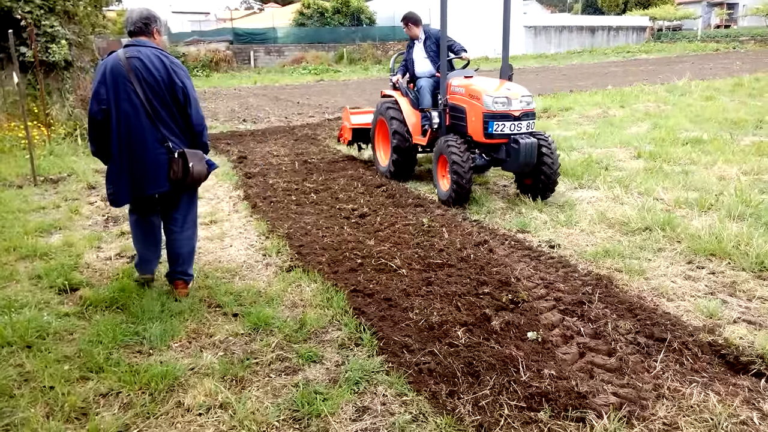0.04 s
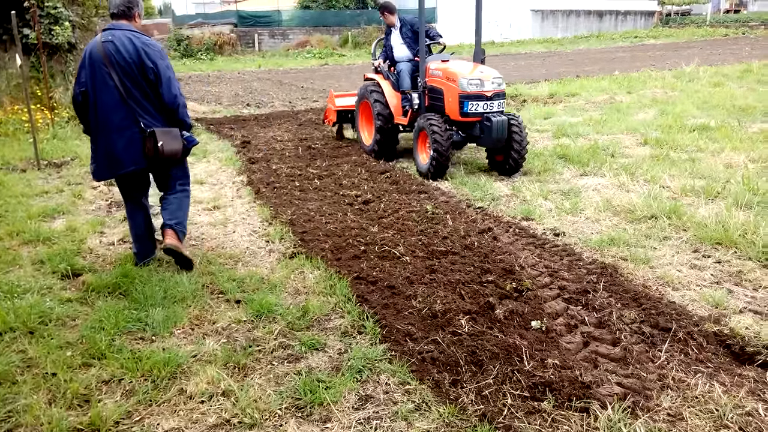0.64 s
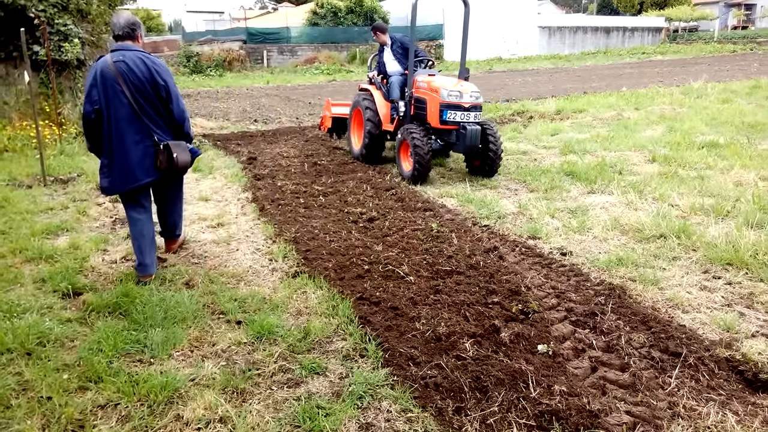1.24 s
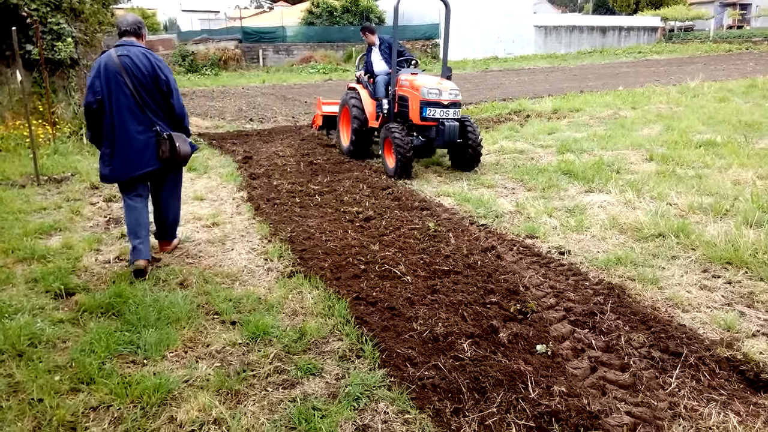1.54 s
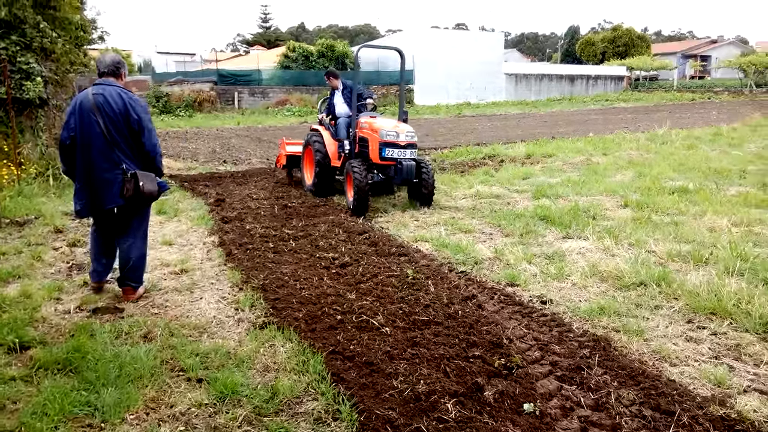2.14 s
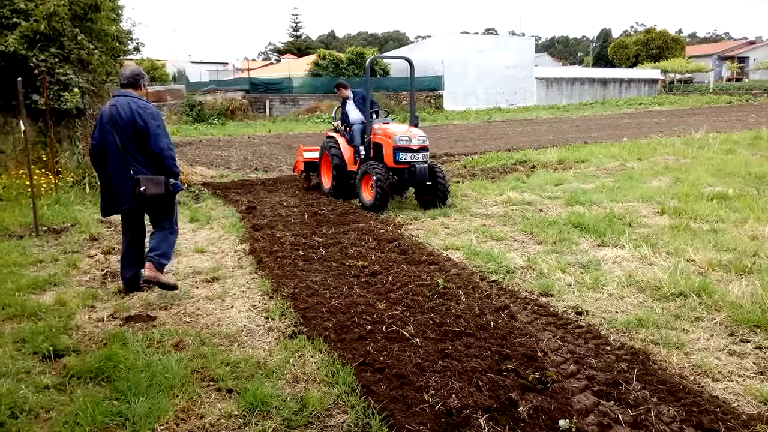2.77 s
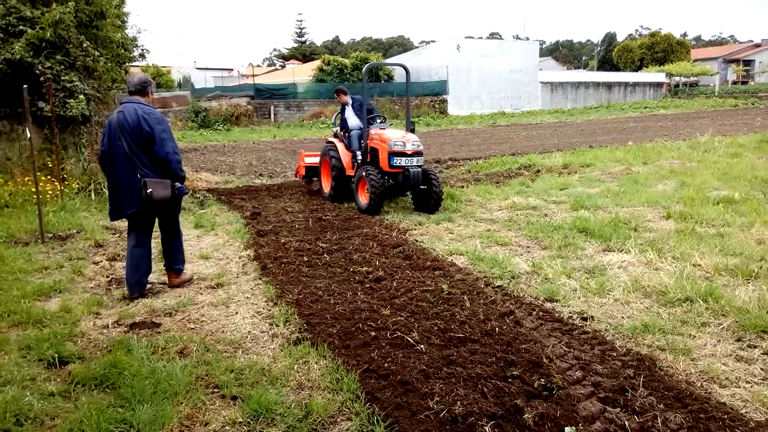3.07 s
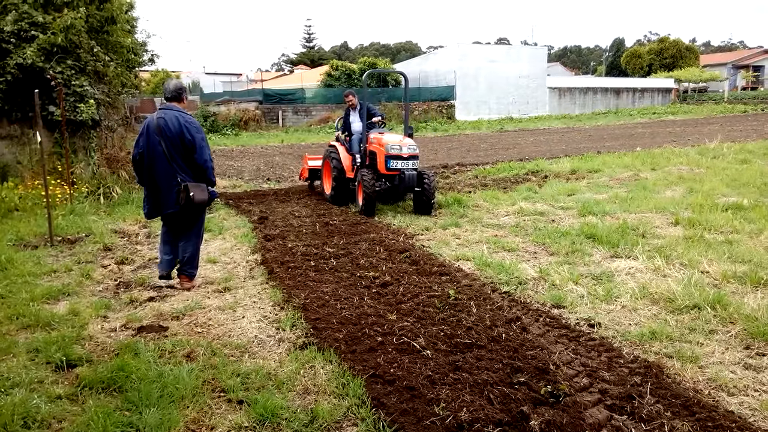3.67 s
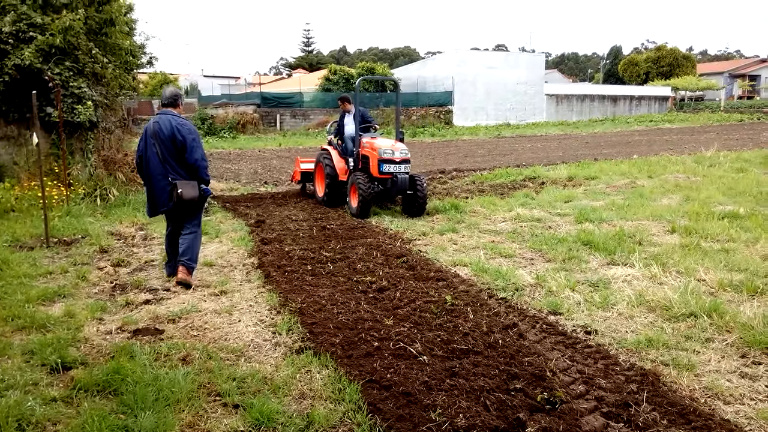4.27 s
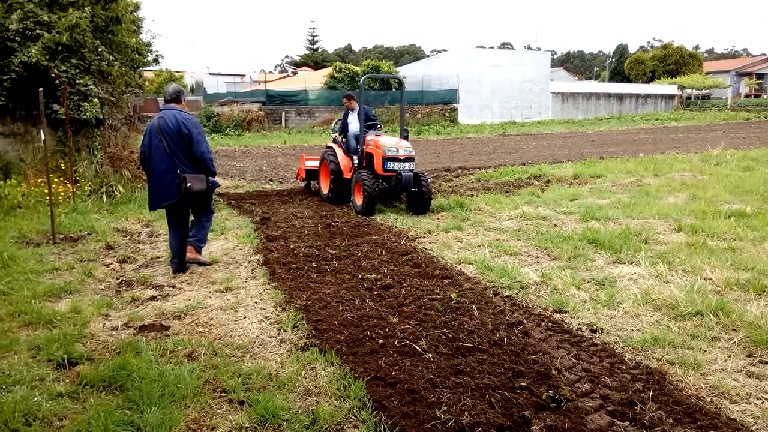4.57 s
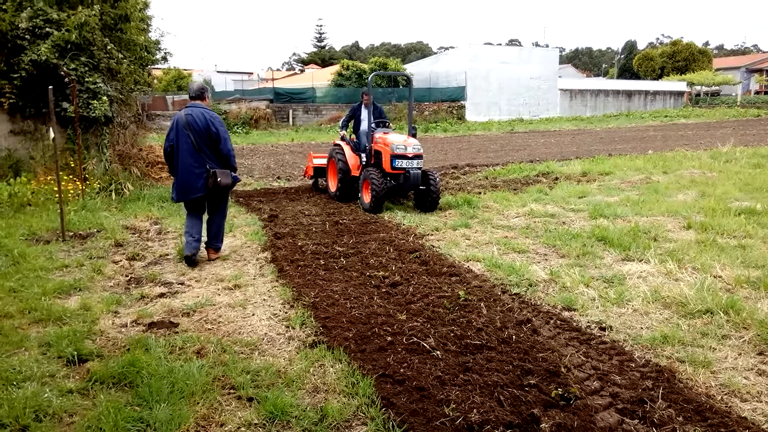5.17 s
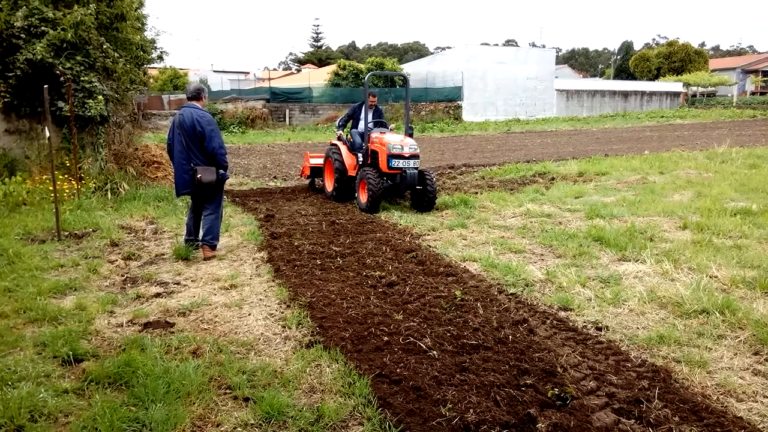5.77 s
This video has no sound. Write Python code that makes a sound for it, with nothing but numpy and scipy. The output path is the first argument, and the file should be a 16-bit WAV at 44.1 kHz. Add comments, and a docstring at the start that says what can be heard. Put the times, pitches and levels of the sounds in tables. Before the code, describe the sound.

A compact diesel tractor runs without pause for six seconds in an open field, heard from several metres away. A low throbbing exhaust drone sits under a dense clatter of engine knock, ticking valves and soil pattering on the tiller's hood, with a low rumble and faint high whines. The engine speed sags and recovers slightly as the tines bite. The sound is closest at the start; the sharpest knocking fades around 1.5 seconds, and the whole machine recedes gradually until about 4.5 seconds, then holds steady. Light metal clanks come near 0.1, 0.6, 0.8, 1.4, 2.4 and 3.9 seconds. Short, high steel squeaks occur near 0.1, 0.9, 2 and 2.4 seconds, then cluster between 3 and 4 seconds. The engine keeps throbbing to the end, with soft low puffs of wind around 5.2 and 5.9 seconds.

```python
"""Tractor tilling a field

A compact three-cylinder diesel crawls away with a rotary tiller, heard from some metres off.
Its exhaust pulses throb in a harmonic series, and the engine speed sags and recovers as the tines bite.
Impacts ring the resonances of block and panels: injection knock, valves, clods on the tiller's hood.
Friction makes the steel parts squeak now and then, over a low rumble and faint steady whines."""
import sys
import numpy as np
from scipy import signal
from scipy.fft import rfft, irfft
from scipy.io import wavfile

SR = 44100
rng = np.random.default_rng(int(sys.argv[2]) if len(sys.argv) > 2 else 0)


def persist_wave(psi):
    """Save psi, clipped to +-1, as 16-bit WAV."""
    counts = np.round(np.clip(psi, -1, 1) * 32767).astype(np.int16)
    wavfile.write(sys.argv[1], SR, np.atleast_2d(counts).T)


N = 265482
TIME = np.arange(N) / SR
HZ = np.fft.rfftfreq(N, 1 / SR)

# engine speed (t/s, firing rate/Hz)
SPEED = [(0.0, 46.03), (0.55, 45.68), (0.89, 47.03), (1.2, 45.86), (1.43, 47.16), (1.78, 45.34),
         (2.3, 46.4), (2.71, 46.02), (3.12, 47.4), (3.52, 45.88), (3.91, 47.35), (4.28, 46.64),
         (4.43, 45.64), (4.72, 47.52), (6.02, 46.94)]
def engine_cycles():
    """Phase is the integral of frequency: four-stroke cycles elapsed, at three firings each."""
    return .053 + np.cumsum(curve(SPEED)) / SR / 3


# level laws, in the terms of level_db
THROB_LAW, BOOM_LAW = (-33.6, -1.7, -0.6, 1.4), (-19.09, 5.5, 1.12, -0.5)
BARK_LAW = (-29.5, 6, 0.1, -0.9)
# harmonics of the exhaust's bark, with a gear whine at the 40th (multiple of the cycle rate, relative level/dB)
BARK = [(5, -24), (7, -19), (9, 2), (10, -6), (11, -29.5), (12, -3), (13, -26.5), (14, -35), (15, -5),
        (16, -13.5), (17, -31.5), (18, -15.5), (19, -31), (20, -32.5), (21, -28), (22, -26), (24, -28),
        (30, -26), (33, -36), (40, -19)]
# brief swells of a panel humming with the sixth multiple of the firing rate (t/s, duration/s, level/dB)
HUMS = [(1.461, 0.16, -40.5), (3.323, .3, -43)]
def exhaust(cycles):
    """A periodic pulse train radiates harmonics: a clean throb and boom, and a rougher bark; a gear whine rides
    along."""
    outlet = cycles - .056  # each pulse leaves the pipe a moment after its firing
    throb = amp(level_db(THROB_LAW)) * harmonics(outlet, [(3, 0)], flutter=.02)
    boom = amp(level_db(BOOM_LAW)) * harmonics(outlet, [(6, 0)], flutter=.015)
    bark = amp(level_db(BARK_LAW)) * harmonics(outlet, BARK, flutter=.16)
    hum = swells(HUMS) * harmonics(outlet, [(18, 0)], flutter=.33)
    return throb - boom - bark - hum  # the sign turns over above the muffler's resonance


# spectrum of the rumble (f/Hz, relative level/dB)
RUMBLE_SPECTRUM = [(15, -26), (35, -19.5), (60, 2.5), (100, 6.5), (170, 6), (240, 2), (300, -6.5),
                   (400, -23.5), (700, -53)]
# puffs of wind (t/s, duration/s, level/dB)
PUFFS = [(5.22, 0.33, -29.5), (5.902, .17, -29.5)]
def rumble():
    """Turbulent gas, churned soil and wind make broadband noise; its top fades fastest with distance."""
    noise = coloured_noise(spectrum(RUMBLE_SPECTRUM))
    low, low_mid = (shaped(noise, lowpass(hz, 10)) for hz in (145, 270))
    gusts = amp(-34.5 + 0.5 * wander(1.5)) + swells(PUFFS)
    bark_db = level_db(BARK_LAW)  # the upper bands follow the exhaust's bark
    middle = amp(0.75 * bark_db - 8) * (low_mid - low)
    top = amp(1.814 * bark_db + 29.884) * (noise - low_mid)
    return gusts * low + middle + top


def knocks(cycles, blows, uneven_db, ring_s, alike):
    """Crank-timed impacts excite damped ringing, partly the same each time and partly random."""
    t = np.arange(SR // 16) / SR
    decay = np.exp(-t / ring_s)
    repeated, power = np.zeros(N), np.zeros(N)
    for phase, strength in blows:
        at = np.flatnonzero(np.diff(np.floor(cycles - phase)) > 0)
        hits = np.zeros(N)
        hits[at] = strength * amp(uneven_db * rng.standard_normal(len(at)))
        repeated += signal.oaconvolve(hits, decay * rng.standard_normal(len(t)))[:N]
        power += signal.oaconvolve(hits ** 2, decay ** 2)[:N]
    fresh = np.sqrt(abs(power)) * rng.standard_normal(N)
    return alike * unit(repeated) + np.sqrt(1 - alike ** 2) * unit(fresh)


# level laws of the clatter's four bands, low to high
DRONE_LAW, KNOCK_LAW = (-39, 4.5, 0.36, -0.5), (-32.5, 4.5, 0.22, 0.35)
RATTLE_LAW, FIZZ_LAW = (-33, 7.5, 0.4, 1.0), (-40.5, 2.4, 0.44, 1.0)
# blows of injection and valves (phase/cycles, relative strength)
INJECTION = [(.0, 0.66), (.32, 0.94), (.66, 1.11)]
VALVES = [(.14, 0.95), (.3, 0.82), (.47, 0.99), (.63, 1.01), (.8, 0.97), (0.959, .8)]
# broad response of the machine's body (f/Hz, relative level/dB)
BODY_SPECTRUM = [(150, -25.5), (310, -5), (410, -7), (510, -0.5), (780, -3.5), (1030, -5), (1550, -7.5),
                 (2100, 1.5), (2850, -1.5), (3800, 1), (4900, -5), (5800, -7.5), (6900, -14.5),
                 (7600, -25.5), (8400, -59.5)]
# resonances of block, panels and tiller (f/Hz, bandwidth/Hz, lift/dB)
PANELS = [(662, 110, 7), (1323, 130, 11), (1707, 210, 10.5), (1960, 66, 6.5), (2250, 34, 7.5),
          (2445, 106, 8.5), (3093, 60, 6), (3395, 100, 5), (3675, 360, 6), (4370, 52, 5)]
def clatter(cycles):
    """Source and filter: block and panels colour knock, valves, clods and the rush of fan and soil."""
    injection = lambda: knocks(cycles, INJECTION, uneven_db=1.3, ring_s=0.013, alike=.72)
    valves = lambda: knocks(cycles, VALVES, uneven_db=3.5, ring_s=0.012, alike=.45)
    rush = lambda: rng.standard_normal(N)
    drone = injection() + amp(2) * clods() + amp(6.5) * rush()
    knock = injection() + amp(-3.5) * valves() + amp(-1.5) * clods() + amp(2) * rush()
    rattle = valves() + clods() + amp(3) * rush()
    fizz = valves() + amp(1.5) * clods() + amp(3) * rush()
    lifts = sum((amp(db) ** 2 - 1) * abs(resonance(hz, width)) ** 2 for hz, width, db in PANELS)
    body = spectrum(BODY_SPECTRUM) * np.sqrt(1 + lifts)
    low, middle, high = (lowpass(hz, 28) for hz in (1150, 2850, 4700))
    knock_band = abs(middle - low)
    layers = [(drone, low, DRONE_LAW), (knock, knock_band, KNOCK_LAW),
              (rattle, abs(high - middle), RATTLE_LAW), (fizz, 1 - high, FIZZ_LAW)]
    running = sum(amp(level_db(law)) * unit(shaped(drive, body * np.sqrt(band)))
                  for drive, band, law in layers)
    return running + amp(2) * shaped(clanks(), unit(body * knock_band))


def clods(per_s=420, spread_db=2.0, ring_s=0.0054):
    """Shot noise: lumps of soil strike the hood at random, many small and a few large."""
    size = amp(spread_db * np.minimum(rng.exponential(1, N), 4))
    hits = size * (rng.random(N) < per_s / SR)
    power = signal.lfilter([1], [1, -np.exp(-2 / (ring_s * SR))], hits ** 2)
    return unit(np.sqrt(power) * rng.standard_normal(N))


# the hardest knocks (t/s, relative level/dB)
CLANKS = [(0.039, -35), (0.104, -32), (0.567, -28.5), (0.778, -28.5), (1.401, -28), (1.964, -36),
          (2.376, -31), (3.857, -32.5), (3.926, -30.5)]
def clanks(ring_s=0.01):
    """Damping makes each hard knock a burst of noise with an exponential decay."""
    envelope = sum(amp(db) * (TIME >= s) * np.exp(-abs(TIME - s) / ring_s) for s, db in CLANKS)
    return envelope * rng.standard_normal(N)


# modes of the engine's open flank (f/Hz, bandwidth/Hz, relative level/dB)
FLANK_MODES = [(754, 200, -3), (1367, 110, 2), (2227, 90, 3), (2840, 200, -4), (3694, 160, 1),
               (4200, 680, -3)]
def flank(cycles, turn_at_s=1.48, turn_s=0.14):
    """Directivity: injection knock from the side of the block fades as that side turns away."""
    facing = 1 / (1 + np.exp((TIME - turn_at_s) / turn_s))
    power = sum(abs(amp(db) * resonance(hz, width) ** 2) ** 2 for hz, width, db in FLANK_MODES)
    blows = knocks(cycles, INJECTION, uneven_db=2.0, ring_s=0.0096, alike=.4)
    return amp(-37) * facing * unit(shaped(blows, np.sqrt(power)))


# squeaks of the tiller (t/s, duration/s, relative level/dB, steel part)
SQUEAKS = [(0.127, 0.18, -31.5, 1), (0.112, 0.052, -30, 0), (0.788, 0.051, -40, 0), (0.912, 0.085, -33, 1),
           (0.943, 0.08, -36, 2), (1.969, 0.13, -29.5, 0), (2.377, 0.034, -27.5, 1), (2.954, 0.66, -37, 0),
           (3.146, 0.081, -30.5, 1), (3.16, 0.1, -34.5, 2), (3.285, 0.087, -31, 1), (3.305, 0.15, -32.5, 2),
           (3.657, 0.099, -35.5, 2), (3.968, .16, -33.5, 2)]
def squeaks(chatter_db=2.8, chafe_period_s=2.7):
    """Friction: the rotor chafes all the time, and short gritty swells ring one part or another."""
    chafe_db = -43 - 6 * doublings() + 2.5 * np.cos(2 * np.pi * TIME / chafe_period_s)
    out = amp(chafe_db) * unit(steel(part=1) * amp(2 * wander(25)))
    for s, length, db, part in SQUEAKS:
        swell = swell_at(s, length)
        rub = swell * amp(chatter_db * wander(90)) * steel(part)
        out += amp(db - 4.5) * rub * np.sqrt(np.sum(swell ** 2) / np.sum(rub ** 2))
    return out


# modes of the steel (f/Hz, bandwidth/Hz, relative level/dB, part: 0 hood, 1 rotor, 2 skid)
STEEL_MODES = [(2425, 90, 0, 0), (2000, 400, -3, 0), (4474, 55, 0, 1), (4667, 30, -12, 1),
               (4100, 700, -11, 1), (5423, 42, 0, 2), (5612, 55, 0, 2), (5700, 1300, .5, 2)]
def steel(part):
    """Forced vibration: rubbing drives the modes of one part; air absorption dulls the top."""
    modes = sum(amp(db) * resonance(hz, width) ** 2 / np.sqrt(width)
                for hz, width, db, owner in STEEL_MODES if owner == part)
    return coloured_noise(modes * lowpass(6900, 16))


# tones of the fan (multiple of its shaft speed, relative level/dB)
FAN = [(2, -11), (3, -9.5), (4, -20.5), (5, -9.5), (6, -20)]
def fan(cycles, turns_per_cycle=2.56):
    """Rotational noise: the belt-driven fan hums at shaft harmonics, its level following the bark."""
    return amp(level_db(BARK_LAW) - 2) * harmonics(cycles * turns_per_cycle, FAN, flutter=.05)


# whines of belt and transmission, and the skid's steady ring near 5435 Hz (f/Hz, bandwidth/Hz, level/dB)
WHINES = [(1348, 43, -54), (1933, 25, -52.5), (2265, 14, -51.5), (2424, 100, -51), (3314, 44, -49.5),
          (3680, 150, -49.5), (5435, 60, -52.5)]
def whines():
    """Narrow-band noise is heard as wavering tones, which carry on as the rest recedes."""
    return sum(amp(db) * coloured_noise(abs(resonance(hz, width)) ** 2) for hz, width, db in WHINES)


# path of the tractor (t/s, distance/m)
DISTANCE = [(0, 5.8), (1.1, 6.84), (1.8, 9), (4.4, 13.7), (6.02, 14)]
def doublings():
    """Spreading loss goes with the number of times the distance has doubled since the start."""
    metres = curve(DISTANCE)
    return np.log2(metres / metres[0])


# how hard the engine pulls as the tines bite and come free (t/s, effort/dB)
EFFORT = [(0.0, -0.5), (0.12, 1.7), (0.31, -0.8), (0.82, 0.4), (1.0, -4.5), (1.35, 2), (1.54, -2.5),
          (2.13, 2.5), (2.42, 0.2), (2.93, 2.4), (3.23, -0.7), (3.81, 3.5), (4.44, -0.9), (4.93, -1.5),
          (5.39, 0.5), (6.02, -2.5)]
def level_db(law, rated_hz=46.5):
    """Gains add in decibels: a base level, and terms for distance, effort and firing rate."""
    base_db, loss_per_doubling, per_effort_db, per_hz = law
    drive_db = per_effort_db * curve(EFFORT) + per_hz * (curve(SPEED) - rated_hz)
    return base_db - loss_per_doubling * doublings() + drive_db


def harmonics(turns, rows, flutter):
    """Fourier series on a rotation, each line fluttering in amplitude and phase."""
    out = np.zeros(N)
    for order, db in rows:
        # dispersion, as in a muffler, delays the higher lines more
        line = np.exp(2j * np.pi * order * turns - .21j * order ** 2)
        modulation = 1 + flutter * (wander(4.1) + 1j * wander(17))
        out += amp(db) * (line * modulation).real
    return out * np.sqrt(2)


def amp(db):
    """Decibels to amplitude ratio."""
    return 10 ** (np.asarray(db) / 20)


def unit(x):
    """Normalisation to rms 1."""
    return x / np.sqrt(np.mean(x ** 2) + 1e-20)


def curve(rows):
    """Linear interpolation of (t/s, value) points."""
    return np.interp(TIME, *np.transpose(rows))


def spectrum(points):
    """Gain from (f/Hz, level/dB) points, interpolated in log frequency."""
    hz, db = np.transpose(points)
    return amp(np.interp(np.log(HZ + 1), np.log(hz), db))


def shaped(x, gain):
    """Filtering as multiplication of the spectrum."""
    return irfft(rfft(x) * gain, N)


def lowpass(hz, order):
    """Power-law roll-off above a cutoff."""
    return 1 / (1 + (HZ / hz) ** order)


def resonance(hz, width_hz):
    """Response of a damped oscillator, gain 1 at its centre."""
    return 1 / (1 + 2j * (HZ - hz) / width_hz)


def coloured_noise(gain):
    """Filtered white noise of rms 1."""
    return unit(shaped(rng.standard_normal(N), gain))


def wander(rate_hz):
    """Slow random fluctuation of rms 1."""
    return coloured_noise(np.exp(-(HZ / rate_hz) ** 2))


def swell_at(s, length):
    """Gaussian envelope around a moment."""
    return np.exp(-(2 * (TIME - s) / length) ** 2)


def swells(rows):
    """Sum of Gaussian envelopes."""
    return sum(amp(db) * swell_at(s, length) for s, length, db in rows)


# stereo width (f/Hz, side level re mid/dB)
WIDTH = [(100, -20.5), (400, -16), (1200, -16.5), (2400, -16.5), (3000, -4), (3400, -5.5), (4400, -0.5),
         (5000, -7), (5900, 3), (6500, 4.5), (7600, 12)]
# part of that width due to direct sound (f/Hz, level/dB)
DIRECT_SHARE = [(1800, -6.5), (3200, -3), (4100, -1.5), (4600, -7)]
def scene():
    """Direct sound differs in phase between left and right; incoherent scatter widens the treble."""
    cycles = engine_cycles()
    machinery = lambda: rumble() + clatter(cycles) + flank(cycles) + whines() + squeaks()
    direct = exhaust(cycles) + fan(cycles) + machinery()
    width, share = spectrum(WIDTH), spectrum(DIRECT_SHARE)
    scattered = shaped(machinery(), np.sqrt(1 - share ** 2) * width)
    side = shaped(direct, 1j * share * width) + scattered
    return np.array([direct + side, direct - side])


def record(dry, edge_hz=8500):
    """Tapering and band limiting: the sound eases in and out over milliseconds and loses its top."""
    eased = dry * signal.windows.tukey(N, .001)
    kernel = signal.firwin(301, edge_hz, window=("kaiser", 9), fs=SR)
    return signal.oaconvolve(eased, kernel[None], "same")


dry = scene()
out = record(dry)
persist_wave(out)
```